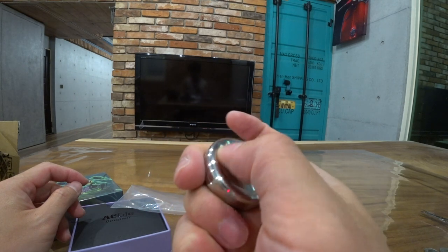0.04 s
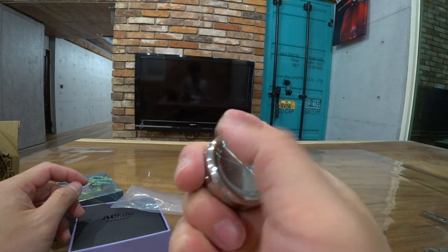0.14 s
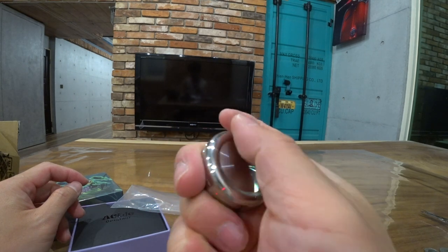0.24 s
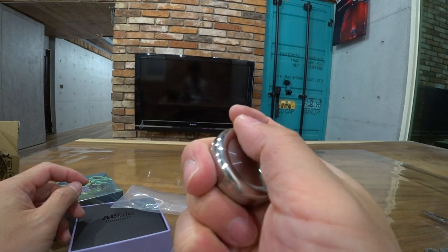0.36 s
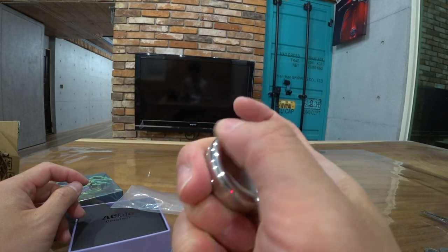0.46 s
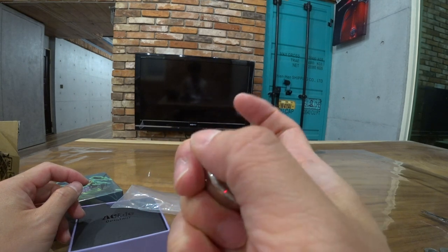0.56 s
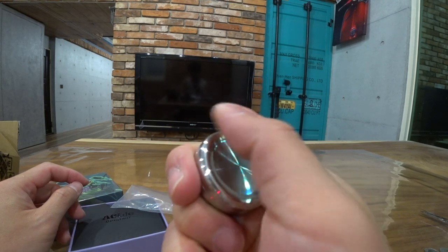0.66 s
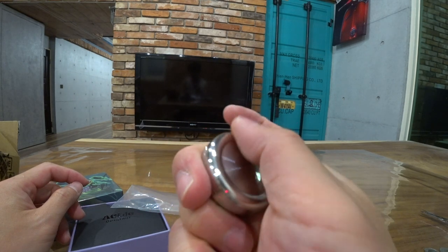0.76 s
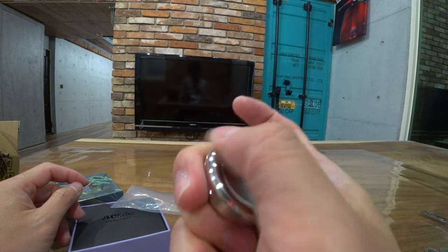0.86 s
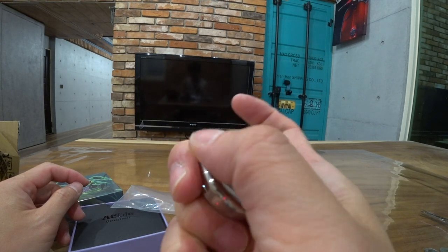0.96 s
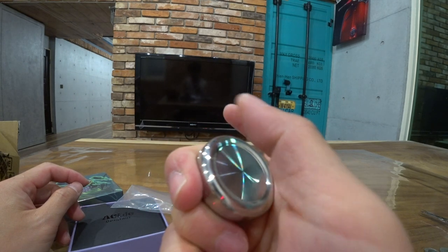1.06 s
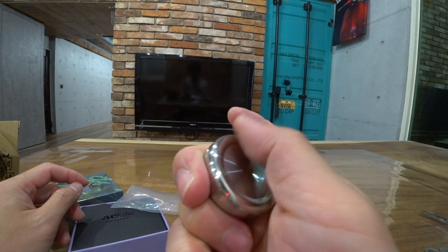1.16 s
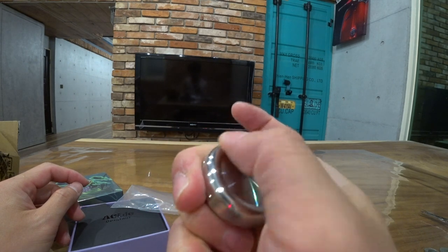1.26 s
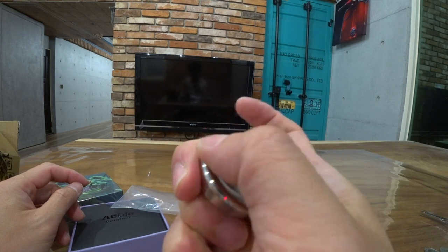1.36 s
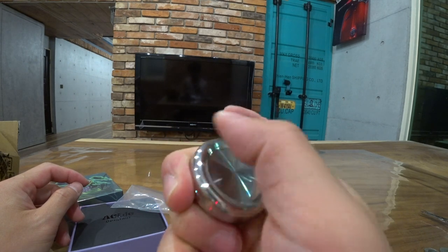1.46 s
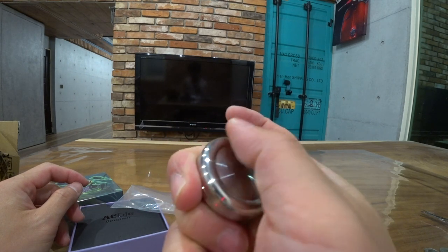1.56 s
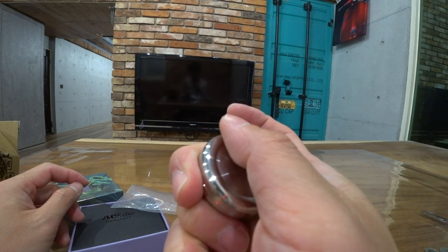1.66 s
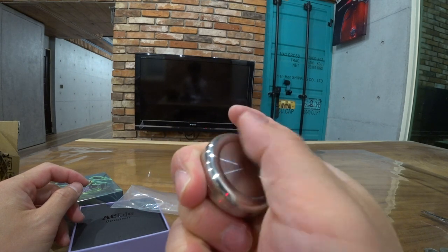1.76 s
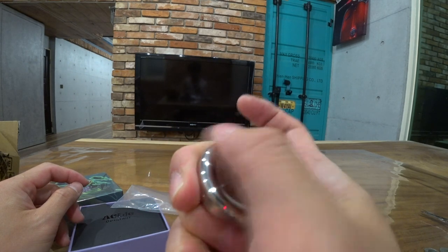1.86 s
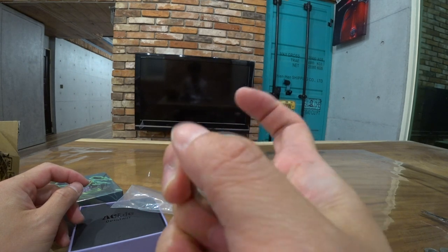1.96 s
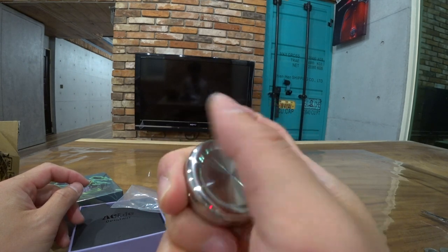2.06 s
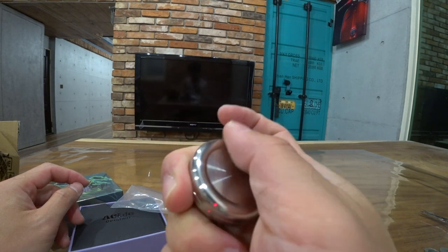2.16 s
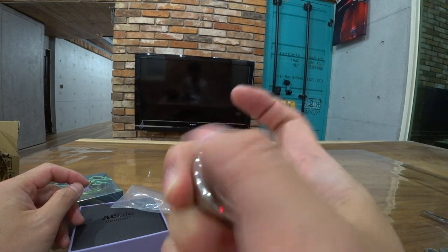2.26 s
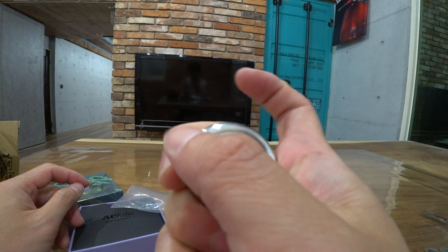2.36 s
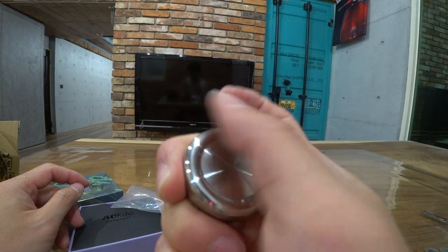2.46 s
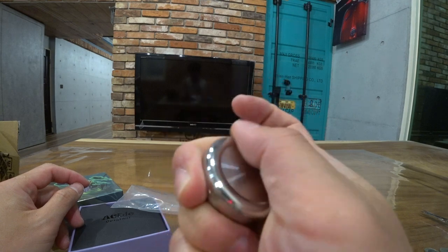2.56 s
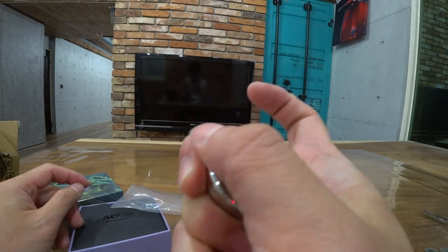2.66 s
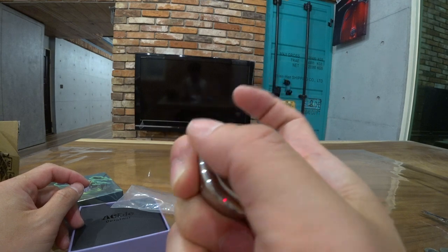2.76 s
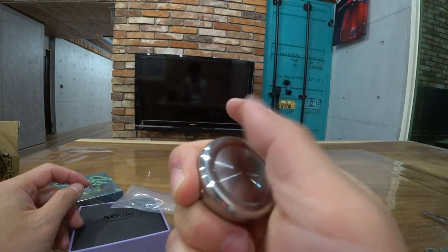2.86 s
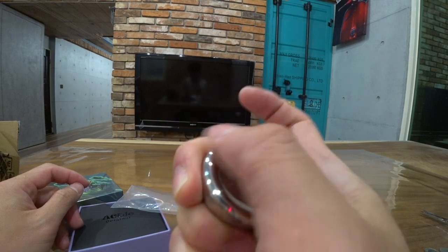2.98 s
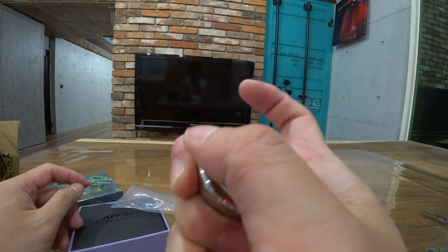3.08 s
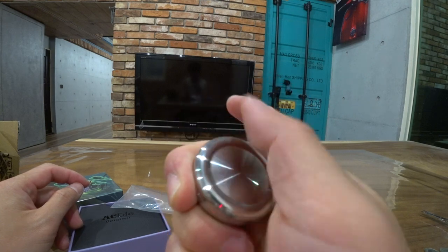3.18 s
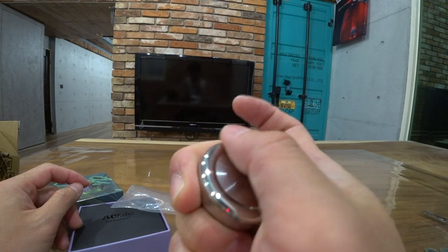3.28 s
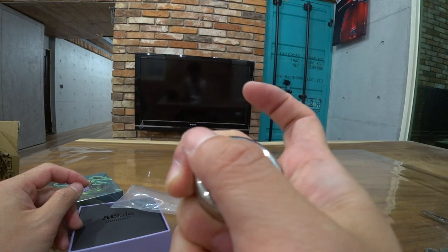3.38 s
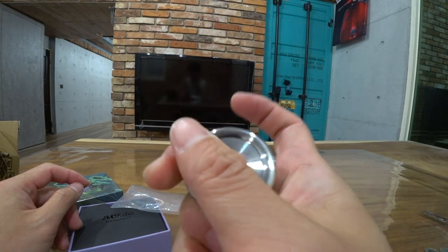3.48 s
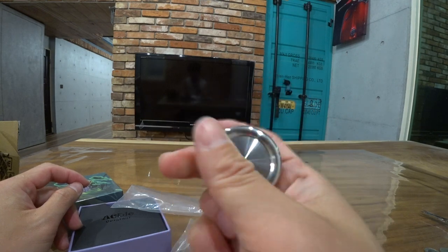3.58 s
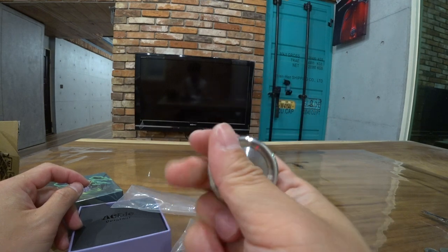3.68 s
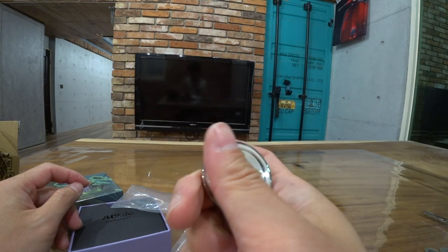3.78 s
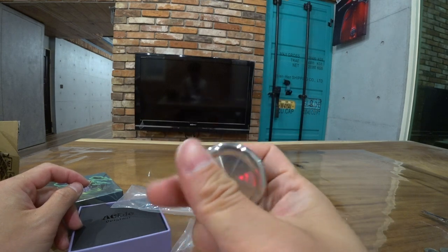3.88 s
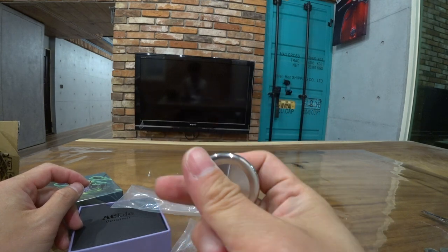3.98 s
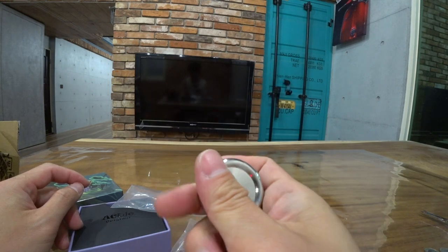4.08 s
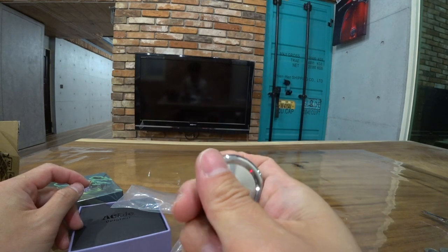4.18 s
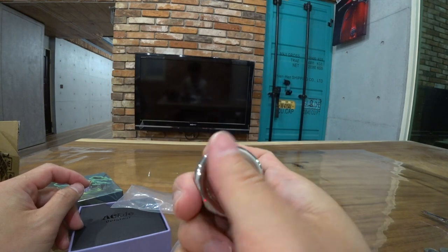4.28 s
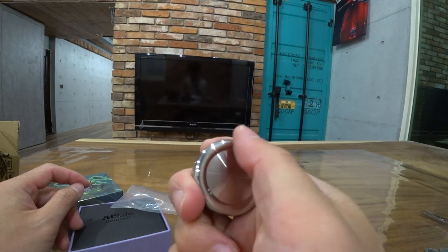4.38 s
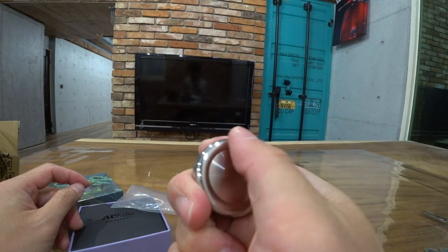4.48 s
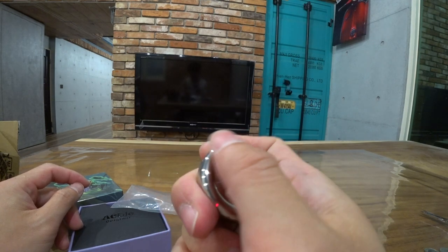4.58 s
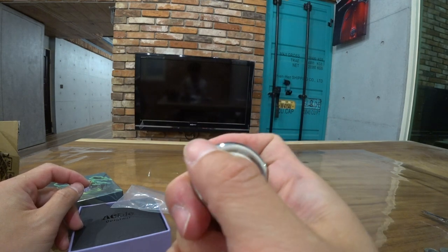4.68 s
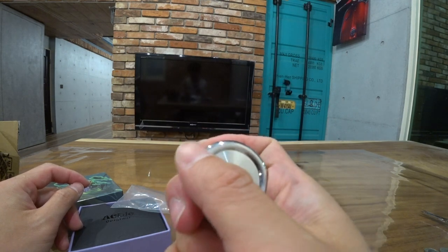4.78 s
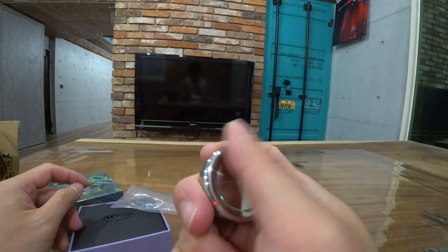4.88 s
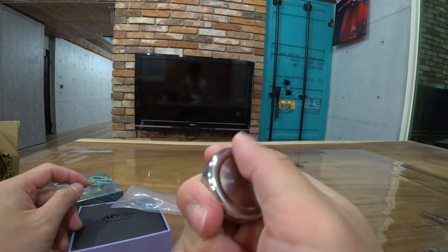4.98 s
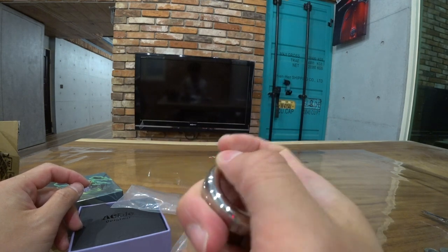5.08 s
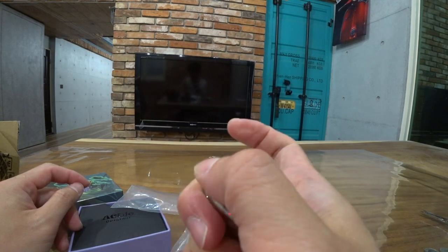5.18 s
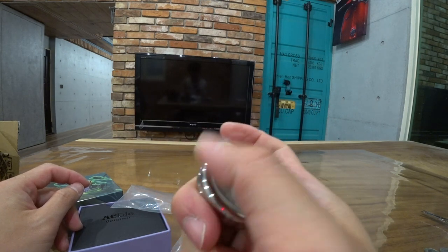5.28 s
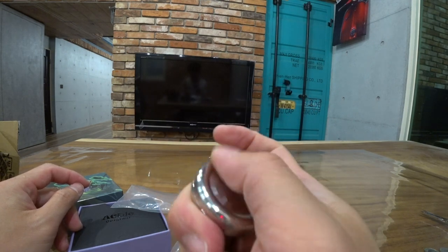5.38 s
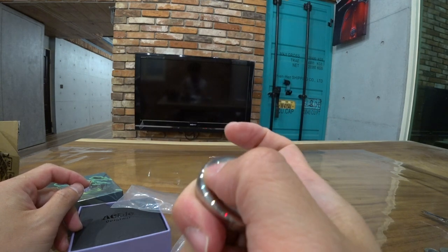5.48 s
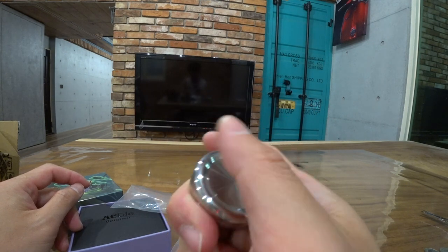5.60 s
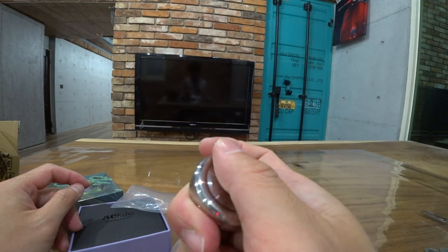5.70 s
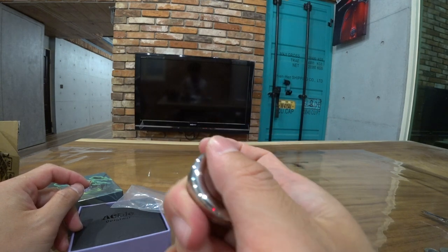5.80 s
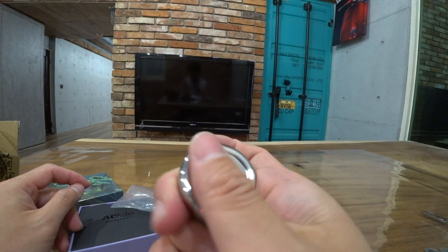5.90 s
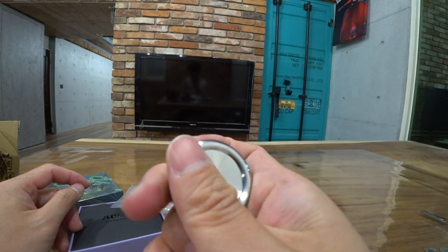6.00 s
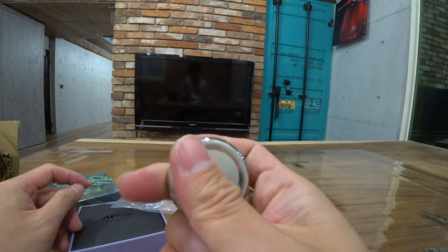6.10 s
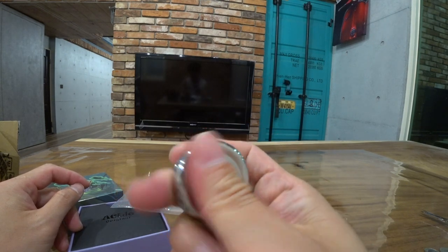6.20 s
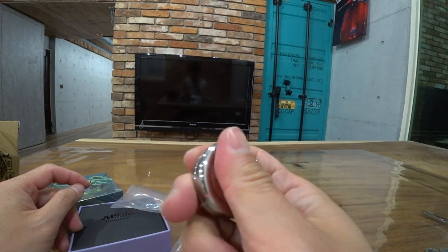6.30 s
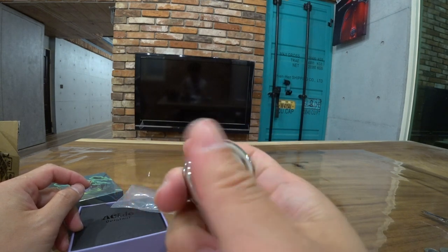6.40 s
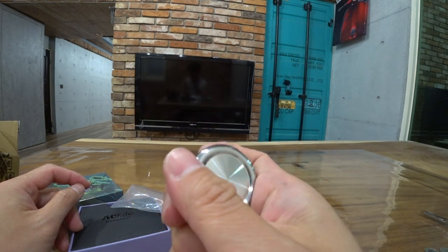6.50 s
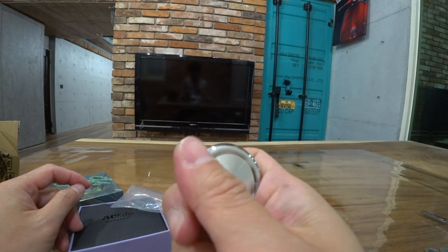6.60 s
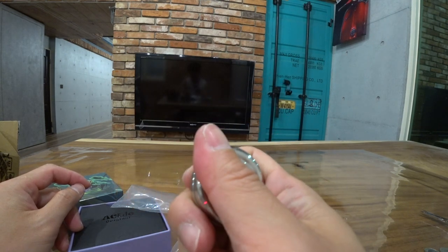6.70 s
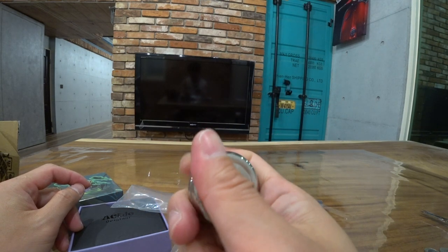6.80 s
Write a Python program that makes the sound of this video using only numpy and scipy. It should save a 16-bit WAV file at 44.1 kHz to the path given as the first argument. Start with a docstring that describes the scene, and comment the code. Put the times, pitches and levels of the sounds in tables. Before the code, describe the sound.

A small metal fidget coin is worked in one hand, close to a stereo microphone in a hard-walled room. Most snaps are a very brief, swelling scrape of metal discs ending in a tight cluster of bright clicks, damped by the fingers, with no bass and a short room echo. Two snaps come at about 0.5 and 0.9 seconds. Three more follow evenly at 1.9, 2.3 and 2.7 seconds, and another at 3.4. After a lull with only faint skin rubs, the hardest, brightest click lands at 4.8 seconds, followed by another sharp snap at 5.2. A softer snap comes at 6.3 seconds, and a small ringing tick with a finger rub at 6.7. Tiny metallic ticks and whispery slips of skin are scattered between the snaps. A faint, steady hush of air and distant machines lies underneath throughout.

```python
"""Fidget coin snaps

A magnetic metal coin is slid and snapped in one hand, close to stereo microphones in a hard-walled room.
Each snap is a rising scrape of the discs and a quick cluster of knocks on finger-damped metal, answered
by the room. Skin rubs and tiny ticks fall in between, over a steady hush of air and far machines."""
import sys
import numpy as np
from scipy import signal
from scipy.fft import rfft, irfft, next_fast_len
from scipy.io import wavfile
from scipy.ndimage import uniform_filter1d

SR = 44100
rng = np.random.default_rng(int(sys.argv[2]) if len(sys.argv) > 2 else 0)


def transcribe(signal):
    """Save signal, clipped to [-1, 1], as a 16-bit WAV file at the path in sys.argv[1]."""
    frames = np.atleast_2d(signal).T
    limited = np.clip(frames, -1, 1)
    pcm = np.round(limited * 32767).astype(np.int16)
    wavfile.write(sys.argv[1], SR, pcm)


N = 302085
PREROLL, SIZE = SR // 3, next_fast_len(N + 2 * SR)  # samples: before time zero, in a whole track
TIME = (np.arange(SIZE) - PREROLL) / SR


def undb(db):
    """Decibels to gain."""
    return 10 ** (np.asarray(db) / 20)

def unit(x):
    """Scale to rms 1."""
    return x / np.sqrt(np.mean(x ** 2))

def bin_hz(size):
    """Frequencies of a spectrum's bins, floored at 1 Hz."""
    return np.maximum(np.fft.rfftfreq(size, 1 / SR), 1)

def curve(table, column):
    """Draw a table column across the spectrum, on a log-frequency axis."""
    points = np.array(table)
    return np.interp(np.log(bin_hz(SIZE)), np.log(points[:, 0]), points[:, column])

def bell(hz, centre_hz, octaves):
    """Bell-shaped band around a centre frequency."""
    return np.exp(-(np.log2(hz / centre_hz) / (2 * octaves)) ** 2)

def add(track, start_s, sound):
    """Drop a sound onto a track."""
    i = PREROLL + int(round(start_s * SR))
    track[i:i + len(sound)] += sound


# Stereo image: (frequency [Hz], left lead of coin and room [rad], of hush [rad], hush likeness [0-1])
STEREO_IMAGE = [(150, 0.27, 0.5, 0.99), (417.5, 0.81, 1.45, 0.11), (710, 0.83, 2.4, 0.71),
                (1610, 1.7, 2.55, 0.54), (3350, 1, 1.86, 1), (6500, 0.43, 1.5, 0.84),
                (14000, 0.22, 0.25, 0.66)]
def stereo(sound, lead, pan_db, side=False):
    """Two microphones hear one sound apart in phase and level; a side signal flips the right one."""
    spectrum = rfft(sound, SIZE)
    left = undb(pan_db / 2) * irfft(spectrum * np.exp(.5j * lead), SIZE)
    right = undb(-pan_db / 2) * irfft(spectrum * np.exp(-.5j * lead), SIZE)
    return np.array([left, -right if side else right])


# Tone of the hush: (frequency [Hz], relative level [dB])
HUSH_EQ = [(18, -67), (30, -35), (103, -22), (239, -0.5), (649, 0.5), (780, 4), (866, -0.5), (1130, 1.5),
           (1460, -2.5), (3980, -12.5), (8740, -21.5), (12300, -20.5), (16000, -26.5)]
# Brief swells in one band of it: (time [s], lift [dB], half width [s], centre [Hz], spread [octaves])
HUSH_SWELLS = [(0, 6, 0.1, 800, 1.2), (4.549, 7, 0.15, 484, 0.071)]
def hush():
    """A bed of air and far machines; the level drifts a little and a band swells now and then."""
    colour, likeness = undb(curve(HUSH_EQ, 1)), curve(STEREO_IMAGE, 3)
    mid, side = (unit(irfft(rfft(rng.standard_normal(SIZE)) * colour, SIZE)) for _ in range(2))
    mid = irfft(rfft(mid) * np.sqrt((1 + likeness) / 2), SIZE)
    side = irfft(rfft(side) * np.sqrt((1 - likeness) / 2), SIZE)
    lead = curve(STEREO_IMAGE, 2)
    bed = stereo(mid, lead, pan_db=-.5) + stereo(side, lead, pan_db=-.5, side=True)
    for s, lift_db, half_s, centre_hz, octaves in HUSH_SWELLS:
        band = irfft(rfft(bed) * bell(bin_hz(SIZE), centre_hz, octaves), SIZE)
        bed += (undb(lift_db) - 1) * np.exp(-((TIME - s) / half_s) ** 2) * band
    drift_db = .6 * np.interp(np.arange(SIZE) / SR, np.arange(40) / 4, rng.standard_normal(40))
    return bed * undb(-57.5 + drift_db)


# Reverb bands: (centre [Hz], t60 [s], level [dB])
REVERB_BANDS = [(1500, 0.29, 3.5), (4000, 0.83, -1.5), (8100, 0.54, -1.5), (15000, 0.17, 0)]
def room_tail(coin, build_ms=8.8, likeness=0.38):
    """Hard walls return a diffuse tail: it builds, dies band by band and is partly alike in both ears."""
    t = np.arange(SR) / SR
    noise = rfft(rng.standard_normal((2, SR)))
    tails = 0
    for centre_hz, t60, db in REVERB_BANDS:
        band = irfft(noise * bell(bin_hz(SR), centre_hz, octaves=0.57))
        tails += undb(db) * band * np.exp(-np.log(1000) * t / t60)
    tails *= 1 - np.exp(-t * 1000 / build_ms)
    mid, side = signal.fftconvolve(coin[None], tails / np.sqrt(SR / 100), axes=1)[:, :SIZE]
    lead = curve(STEREO_IMAGE, 1)
    return (np.sqrt((1 + likeness) / 2) * stereo(mid, lead, pan_db=-1.5)
            + np.sqrt((1 - likeness) / 2) * stereo(side, lead, pan_db=-1.5, side=True))


# Ringing modes of the coin: (frequency [Hz], level [dB])
COIN_MODES = [(1850, 4), (2270, -3.5), (2760, -2), (3100, 0), (3470, -0.5), (3850, 0.5), (4430, -0.5),
              (4880, 1), (5300, -3), (6060, -1), (6680, 0.5), (7480, 2.5), (8300, -3.5), (9260, -4.5),
              (10300, -6.5), (12500, -4), (13700, -3), (15000, -4.5)]
def struck_metal(hits, scatter, hard_octaves, time_scale=1):
    """Each hit rings the modes near its centre; fingers detune them and damp the high ones sooner."""
    track, t = np.zeros(SIZE), np.arange(SR // 20) / SR
    mode_hz, mode_db = np.transpose(COIN_MODES)
    variations = scatter * rng.standard_normal((len(hits), 3, len(mode_hz)))
    alternating = (-1) ** np.arange(len(mode_hz))  # neighbouring modes swing against each other
    for (s, db, centre_hz, octaves, t60_ms, choke), (detune, accent, phase) in zip(hits, variations):
        octaves = max(octaves, .03)
        polarity = alternating if octaves < hard_octaves else 1  # in step, they make one sharp edge
        gains = polarity * undb(mode_db + 0.48 * accent) * bell(mode_hz, centre_hz, octaves)
        attack_s = time_scale * 0.00042 * (octaves / 0.15) ** -.7  # hard contacts are wide and sudden
        decay_s = time_scale * t60_ms / 1000 * (mode_hz[:, None] / centre_hz) ** -.8
        age = np.maximum(t - attack_s, 0) / decay_s
        fade = np.exp(-np.log(1000) * age ** choke)  # choke 1 dies evenly; more holds, then stops
        tuned_hz = mode_hz * (1 + 0.025 * detune)
        partials = np.sin(2 * np.pi * tuned_hz[:, None] * t + phase[:, None])
        ring = gains @ (fade * partials) * np.minimum(t / attack_s, 1) ** 1.9
        ring /= np.abs(signal.hilbert(ring)).max()
        add(track, s, undb(db) * ring / np.sqrt(0.75 * time_scale))  # shorter rings keep their energy
    return track

def friction(strokes, octaves, grain_db, ring_db, mode_width_hz):
    """Surfaces drag in dense, uneven grains that swell and die, coloured by the coin's modes."""
    track, size = np.zeros(SIZE), 8192
    ms, hz = (np.arange(size) - size // 2) / SR * 1000, bin_hz(size)
    modes = sum(undb(db) / (1 + (2 * (hz - mode_hz) / mode_width_hz) ** 2) for mode_hz, db in COIN_MODES)
    for s, db, rise_ms, fall_ms, centre_hz in strokes:
        noise = rng.standard_normal(size)
        roughness = np.repeat(rng.uniform(-2, 2, size // 32), 32)
        grains = noise * undb(grain_db * uniform_filter1d(roughness, size=24))
        colour = bell(hz, centre_hz, octaves) * (1 + undb(ring_db) * modes)
        swell = undb(db - 20 * np.where(ms < 0, -ms / rise_ms, ms / fall_ms))
        add(track, s - size // 2 / SR, swell * unit(irfft(rfft(grains) * colour)))
    return track


# Skin rubs: (peak time [s], level [dB], 20 dB rise and fall [ms], centre [Hz])
SKIN_RUBS = [(.055, -55, 54, 11000), (0.164, -52, 17, 10300), (1.333, -50.5, 29, 5500),
             (1.442, -61, 23, 6970), (2.616, -46.5, 15, 5000), (3.141, -56.5, 10, 6780),
             (3.546, -51.5, 15, 9150), (3.869, -60.5, 33, 7100), (4.124, -60.5, 28, 7900),
             (4.64, -50.5, 35, 6600), (5.477, -49.5, 38, 9300), (5.568, -54, 23, 9940),
             (5.979, -59, 20, 6540), (6.089, -59.5, 49, 6300), (6.216, -53, 12, 6960),
             (6.635, -55, 56, 5900), (6.695, -44.5, 38.5, 6300), (6.83, -61, 43, 7800)]
def skin_rubs():
    """Skin slips on the coin: a soft, broad whisper that fades in and out evenly."""
    strokes = [(s, db, ms, ms, hz) for s, db, ms, hz in SKIN_RUBS]
    return friction(strokes, octaves=0.8, grain_db=4.0, ring_db=-3.0, mode_width_hz=990)


# Lone ticks: (time [s], level [dB], centre [Hz])
DISC_TICKS = [(0.334, -53, 2740), (.451, -49.5, 4530), (0.532, -34.5, 3060), (0.651, -43.5, 2850),
              (0.8253, -45, 3370), (0.903, -32.5, 2190), (1.261, -38, 5480), (1.323, -45, 6420),
              (1.337, -43.5, 5060), (1.837, -44, 2150), (1.871, -43, 5200), (2.251, -39, 5800),
              (2.597, -38.5, 2900), (3.03, -42, 5000), (4.6429, -40.5, 2920), (5.071, -46.5, 3060),
              (5.153, -37, 2700), (6.201, -44, 6500), (6.4136, -43.5, 8500), (6.6976, -39.5, 2700)]
def tick_hits(octaves_per_khz=0.057, t60_cycles=16.5, choke=1.09):
    """The discs touch lightly; the higher the tick, the harder, wider and shorter the hit."""
    return [(s, db, hz, octaves_per_khz * hz / 1000, 1000 * t60_cycles / hz, choke)
            for s, db, hz in DISC_TICKS]


# Scrapes: (peak time [s], level [dB], 20 dB rise [ms], centre [Hz])
DISC_SCRAPES = [(0.545, -23, 25.5, 4370), (0.923, -29.5, 28.5, 4700), (1.922, -21.5, 14.5, 4660),
                (2.313, -23, 16.5, 4600), (2.683, -27, 15.5, 5000), (3.031, -55, 61.5, 5050),
                (3.383, -27, 16, 4890), (5.171, -31, 24.5, 7500), (6.262, -30, 22.5, 6060)]
def disc_scrapes(fall_ms=13.4):
    """The discs grind over each other: a metallic scrape that swells and drops away fast."""
    strokes = [(s, db, rise_ms, fall_ms, hz) for s, db, rise_ms, hz in DISC_SCRAPES]
    return friction(strokes, octaves=0.62, grain_db=5.0, ring_db=0.0, mode_width_hz=140)


# Knocks that make up the snaps: (time [s], level [dB], centre [Hz], spread [octaves])
SNAP_KNOCKS = [(0.54, -15, 3550, 0.39), (0.5432, -19, 3600, 0.15), (.5450, -11, 4260, 0.28),
               (0.548, -11.5, 4400, 0.19), (0.919, -13, 6700, 0.11), (0.9221, -20, 5750, 0.7),
               (0.9231, -8.5, 5160, 0.62), (0.9277, -15, 3360, 0.3), (1.9184, -15.5, 3030, 0.33),
               (1.9233, -6.5, 5100, 0.52), (1.927, -6, 4700, 0.32), (1.9300, -17, 4800, 0.14),
               (2.3052, -14.5, 4400, 0.12), (2.3094, -17.5, 4560, .2), (2.3127, -20, 5670, 0.15),
               (2.3163, -6.5, 4900, 0.34), (2.321, -10.5, 4200, 0.34), (2.3224, -13.5, 3305, .2),
               (2.3252, -20.5, 3550, 0.087), (2.686, -6.5, 5280, 0.35), (2.6886, -11, 5130, 0.21),
               (2.6900, -17, 5200, 0.34), (3.3807, -11, 4480, 0.37), (3.3818, -22.5, 7800, 0.11),
               (3.384, -9.5, 4080, 0.22), (3.3870, -13, 4660, 0.16), (4.7943, -3.5, 9420, 0.68),
               (4.7953, -14, 7100, 0.57), (5.172, -13.5, 2900, 0.15), (5.1728, -7, 8300, 0.77),
               (5.174, -11, 7950, 0.31), (6.2527, -19, 4000, 0.48), (6.257, -15, 6700, .4),
               (6.2616, -23, 2670, 0.094), (6.2603, -14.5, 6460, 0.45), (6.2662, -19.5, 3830, 0.051),
               (6.6852, -22.5, 3410, .024)]
def snap_hits(t60_ms=4.995, hard_choke=1.09, ring_choke=2.2, narrow_octaves=0.28):
    """Wide knocks are hard contacts; narrow ones ring on until the discs clamp together and choke them."""
    hits = []
    for s, db, hz, octaves in SNAP_KNOCKS:
        narrowness = np.exp(-(octaves / narrow_octaves) ** 2)
        hits.append((s, db, hz, octaves, t60_ms, hard_choke + (ring_choke - hard_choke) * narrowness))
    return hits


def air_push(time_s=4.7946, level_db=-27.5, half_width_ms=.07, low_cut_hz=250):
    """The hardest snap also shoves the air one way, in a single short pulse."""
    pulse = undb(level_db) * np.exp(-((TIME - time_s) * 1000 / half_width_ms) ** 2)
    return signal.lfilter(*signal.butter(1, low_cut_hz, "high", fs=SR), pulse)


# Grips of the hand: (from time [s], room send [dB], main hollow [Hz], its lift in the send [dB],
# finger shade [Hz], its gain in the direct sound [dB], side hollow [Hz])
HAND_GRIPS = [(-.3, -26.5, 4160, -1, 6000, -6, 2230), (.3, -34.5, 2280, 14, 5900, -12, 3830),
              (.75, -32, 3470, 7, 5700, -5.5, 6600), (1.5, -26, 4750, 6, 5800, -10, 2100),
              (2.2, -26, 4860, 0.5, 2050, -13, 5900), (2.5, -24.5, 2650, 11, 1950, -12.5, 6020),
              (3.2, -27, 3870, 7, 2060, -11.5, 4970), (4.5, -22.5, 5950, 6.5, 4500, -10.5, 5550),
              (5.0, -26.5, 4600, 11.5, 4700, -9.5, 6860), (6.0, -34.5, 3710, 6.5, 5000, -1, 2700),
              (6.5, -37.5, 3360, 14, 5000, -4, 12900)]
def hand(direct, send, shade_octaves=0.37, hollow_width_hz=210, side_lift_db=5):
    """Fingers shade one band, mostly in the direct sound; hollows lift two, mostly toward the room."""
    coin, held = np.array([direct, send]), np.zeros((2, SIZE))
    starts = [PREROLL + int(grip[0] * SR) for grip in HAND_GRIPS]
    for grip, start, end in zip(HAND_GRIPS, starts, [*starts[1:], SIZE]):
        _, send_db, main_hz, lift_db, shade_hz, shade_db, side_hz = grip
        band = signal.lfilter(*signal.iirpeak(shade_hz, 1 / shade_octaves, SR), coin[:, start:end])
        shaded = coin[:, start:end] + (undb([[shade_db], [0.17 * shade_db]]) - 1) * band
        hollows = sum((undb(db) - 1) * signal.lfilter(*signal.iirpeak(hz, hz / hollow_width_hz, SR), shaded)
                      for hz, db in [(main_hz, lift_db), (side_hz, side_lift_db)])
        held[0, start:end] = shaded[0] + 0.4 * hollows[0]
        held[1, start:end] = undb(send_db) * (shaded[1] + hollows[1])
    return held


def scene():
    """The mix: coin and skin up close, their room tail behind, the hush underneath."""
    rubbing = disc_scrapes() + skin_rubs()
    # A hit is (time [s], level [dB], centre [Hz], spread [octaves], t60 [ms], choke [exponent]).
    opening_snap = (-.12, -6, 4500, .5, 11.25, 1)  # before time zero: only its room tail is heard
    hits = [opening_snap, *snap_hits(), *tick_hits()]
    direct = struck_metal(hits, scatter=0.89, hard_octaves=0.56)
    # The room hears all directions at once: the modes even out and blur, as in a shorter knock.
    send = struck_metal(hits, scatter=0.4, hard_octaves=np.inf, time_scale=0.56)
    low_cut = signal.butter(4, 1300, "high", fs=SR, output="sos")  # so small a body sends out no bass
    direct, send = hand(*signal.sosfilt(low_cut, [direct + rubbing, send + rubbing]))
    close = stereo(direct + air_push(), curve(STEREO_IMAGE, 1), pan_db=-1.4)
    mix = close + room_tail(send) + hush()
    return mix[:, PREROLL:PREROLL + N]

def record(dry, top_hz=15900):
    """Slightly lopsided microphones leave a faint thump under loud clicks; a steep filter cuts the top."""
    bent = dry + .02 * dry ** 2
    return signal.sosfilt(signal.ellip(10, .2, 70, top_hz, fs=SR, output="sos"), bent)


dry = scene()
out = record(dry)
transcribe(out)
```